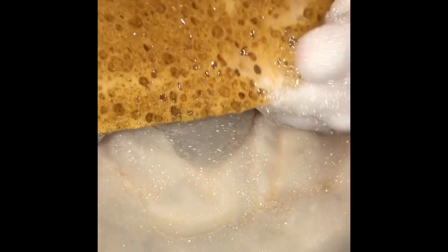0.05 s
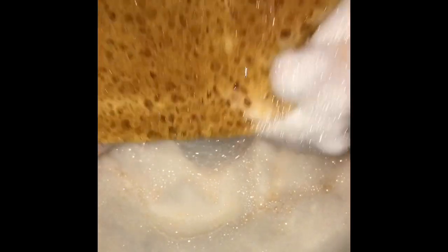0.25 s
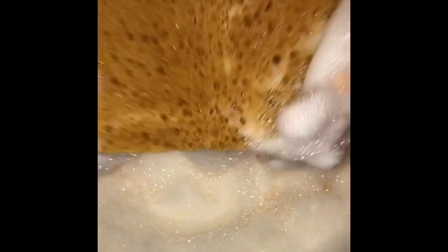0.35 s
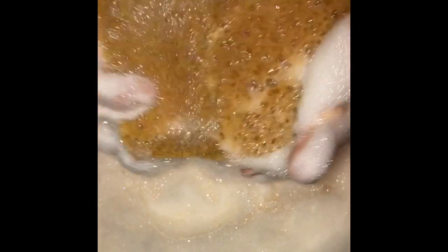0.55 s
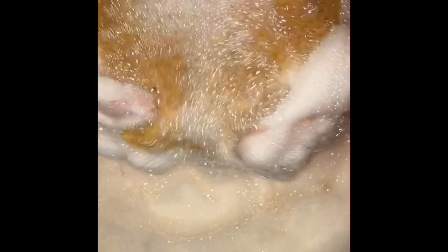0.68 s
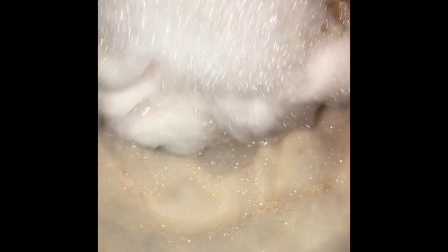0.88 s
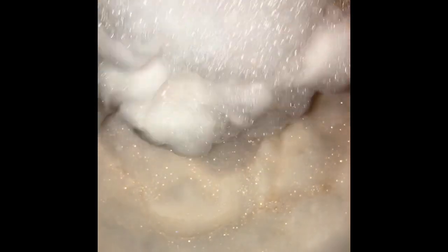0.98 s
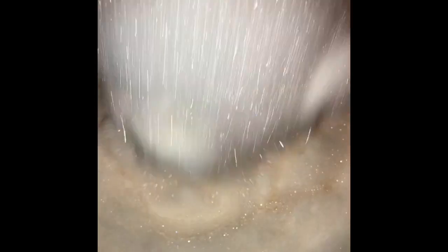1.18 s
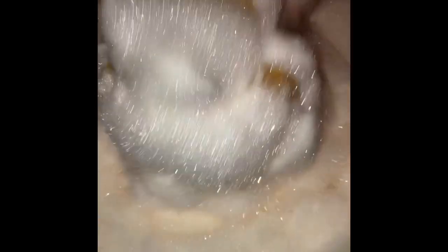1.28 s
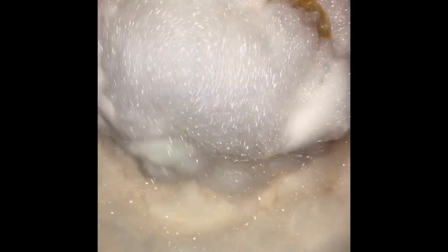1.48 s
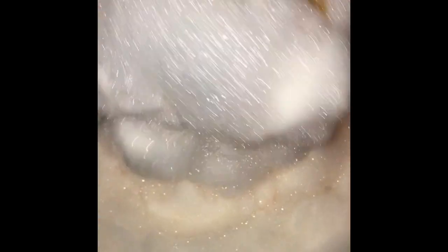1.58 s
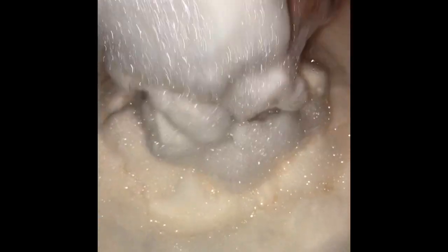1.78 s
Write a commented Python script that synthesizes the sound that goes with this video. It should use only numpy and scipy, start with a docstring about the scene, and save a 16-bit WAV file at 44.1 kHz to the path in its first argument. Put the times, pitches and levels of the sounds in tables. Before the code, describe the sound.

Close squishing and fizzing of a soapy sponge being squeezed, then a few small wet spurts.

```python
"""A soapy sponge is squeezed by two hands over a basin of foam, close to a mono microphone in a quiet room.
Lather churns in the cavity of the hands, water gurgles, and air fizzes from the pores until the sponge
is flat. A second grip forces out a few wet spurts and low gulps; all the while the foam crackles faintly.
Bursting films act as impulses, and ringing bubbles as damped oscillators."""
import sys
import numpy as np
from scipy import signal
from scipy.fft import rfft, irfft, next_fast_len
from scipy.io import wavfile
from scipy.ndimage import map_coordinates

SR = 44100
rng = np.random.default_rng(int(sys.argv[2]) if len(sys.argv) > 2 else 0)


def output_pcm(signal):
    """Save a mono or channel-first signal as 16-bit PCM at the path in sys.argv[1].

    Samples are clipped to [-1, 1] before scaling.
    """
    pcm = np.clip(np.atleast_2d(signal).T, -1, 1) * 32767
    wavfile.write(sys.argv[1], SR, np.round(pcm).astype(np.int16))


N = 81585


def amp(db):
    """Amplitude ratio of a level in decibels."""
    return 10 ** (np.asarray(db) / 20)


def unit(x):
    """Normalisation to unit rms."""
    return x / np.sqrt(np.mean(x ** 2) + 1e-20)


def curve(rows):
    """Linear interpolation of (time [s], value) rows at every sample."""
    return np.interp(np.arange(N) / SR, *np.transpose(rows))


def wobble(knots_per_s):
    """Random modulation: a spline through Gaussian values."""
    return map_coordinates(rng.standard_normal(1000), [np.arange(N) * knots_per_s / SR], mode="wrap")


def coloured(x, spectrum):
    """Minimum-phase filtering by (frequency [Hz], gain [dB]) rows, at unit rms."""
    m = 2 * next_fast_len(N)
    hz, db = np.transpose(spectrum)
    gain = amp(np.interp(np.log(np.fft.rfftfreq(m, 1 / SR) + 1), np.log(hz), db))
    cepstrum = irfft(np.log(gain), m)
    cepstrum[1:m // 2] *= 2  # folding onto positive time makes the filter causal
    cepstrum[m // 2 + 1:] = 0
    return unit(irfft(rfft(x, m) * np.exp(rfft(cepstrum)), m)[:N])


def pops(per_s, spread_db):
    """Shot noise: films burst independently, each an impulse of random size and sign."""
    size = amp(spread_db * np.minimum(rng.exponential(size=N), 4))
    bursts = rng.random(N) < per_s / SR
    return unit(bursts * size * rng.choice([-1, 1], N))


def bubbles(low_hz, high_hz, decay_cycles, spread_db, rise, count):
    """Bubble resonance: a swarm of damped sinusoids, each climbing a little in pitch."""
    onset, pitch, size, life = rng.random((count, 4)).T[:, :, None]
    hz = low_hz * (high_hz / low_hz) ** pitch
    k = np.arange(SR // 80)
    age = k / SR * hz / (decay_cycles * (.5 + life))  # in decay times
    phase = 2 * np.pi * hz * k / SR * (1 + rise * np.minimum(age, 2))
    gain = amp(-spread_db * np.log(np.maximum(size, .03))) * rng.choice([-1, 1], (count, 1))
    tones = gain * np.sin(phase) * np.exp(-age)
    samples = (onset * N).astype(int) + k
    return unit(np.bincount(samples.ravel(), tones.ravel())[:N])


# Resonance of the cupped hands (time [s], frequency [Hz], strength [ratio])
HAND_RESONANCE = [(0, 990, 0.45), (.4, 980, .15), (.65, 1450, 0.39), (.85, 1330, 1.25), (1.05, 1270, 1.1),
                  (1.25, 1040, 1.3), (1.34, 1130, 0.54), (1.48, 1060, 1.4), (1.58, 880, 0.45),
                  (1.75, 1200, 0.64)]


def hand_cavity(x):
    """Cavity resonance: the hands ring at a pitch set by the grip, more clearly as they close."""
    rows = np.array(HAND_RESONANCE)
    hz, strength = curve(rows[:, :2]), curve(rows[:, ::2])
    centres = np.geomspace(850, 1600, 8)  # Hz; the pitch moves by crossfading these resonators
    ring = sum(np.interp(hz, centres, share) * signal.lfilter(*signal.iirpeak(centre, Q=5.5, fs=SR), x)
               for centre, share in zip(centres, np.eye(len(centres))))
    return unit((x + strength * ring) / (1 + strength / 2))


# Flow of lather (time [s], relative level [dB])
LATHER_FLOW = [(0, -63.5), (.095, -58.5), (.125, -59.5), (.2, -52.5), (.3, -46.5), (.36, -41), (.45, -40.5),
               (.53, -41.5), (.64, -39), (.73, -42.5), (.8, -45.5), (.9, -46.5), (1.03, -48.5),
               (1.1, -55.5), (1.16, -66.5), (1.227, -62), (1.234, -51), (1.275, -55), (1.34, -48),
               (1.36, -51.5), (1.42, -51.5), (1.5, -55.5), (1.59, -52.5), (1.655, -67.5), (1.74, -58),
               (1.8, -63), (1.85, -59)]
# Spectrum of the churning (frequency [Hz], gain [dB])
LATHER_SPECTRUM = [(60, -33), (150, -26), (330, -16.5), (560, -11), (720, -6), (900, -0.5), (1400, 0.5),
                   (1750, -2), (2300, -8.5), (4000, -17.5), (15000, -39.5)]


def lather():
    """Source and resonator: large bubbles form and burst in the lather, exciting the hand cavity."""
    swarm = bubbles(low_hz=395.3, high_hz=2564, decay_cycles=3.46, spread_db=3.5, rise=.046, count=2600)
    churn = coloured(pops(per_s=4000, spread_db=3) + amp(-10.5) * swarm, LATHER_SPECTRUM)
    return hand_cavity(churn) * amp(curve(LATHER_FLOW) + .5 + .66 * wobble(70))


# Resting foam, livelier when freshly stirred (time [s], level [dB])
FOAM_LEVEL = [(0, -70.5), (.2, -70), (.9, -69), (1.15, -64.5), (1.31, -63), (1.46, -64.5), (1.62, -66.5),
              (1.85, -67.5)]
# Spectrum of its bursts (frequency [Hz], gain [dB])
FOAM_SPECTRUM = [(300, 5), (1500, -1), (4000, 0.5), (8000, 2.5), (13000, -1), (15500, -2)]


def foam_crackle():
    """Film rupture: single bubbles keep bursting in the resting foam."""
    return amp(curve(FOAM_LEVEL)) * coloured(pops(per_s=2000, spread_db=2.5), FOAM_SPECTRUM)


# Tearing of small bubbles (time [s], level [dB])
FROTH_LEVEL = [(0.0, -70), (0.06, -59.5), (0.128, -62.5), (0.39, -44), (0.478, -43.5), (0.68, -38),
               (0.906, -50), (1.014, -53), (1.04, -47.5), (1.128, -68.5), (1.216, -68.5), (1.236, -55.5),
               (1.252, -63.5), (1.386, -58), (1.498, -66), (1.576, -52.5), (1.654, -71), (1.85, -65)]
# Spectrum of the froth (frequency [Hz], gain [dB])
FROTH_SPECTRUM = [(500, -47.5), (1700, -8), (2200, 3.5), (2650, 0), (3150, 2.5), (3550, -2.5), (4100, -1.5),
                  (5500, -8.5), (7500, -15), (15000, -39)]


def froth():
    """Resonance rises as radius falls: small bubbles tear and ring high at the sponge's surface."""
    swarm = bubbles(low_hz=1798, high_hz=5690, decay_cycles=5.2, spread_db=2.5, rise=.023, count=3000)
    tearing = coloured(pops(per_s=4000, spread_db=1.5) + amp(-10) * swarm, FROTH_SPECTRUM)
    return tearing * amp(curve(FROTH_LEVEL) + .6 * wobble(70.3))


# Water shifting inside the sponge (time [s], level [dB])
WATER_LEVEL = [(0, -74), (.09, -59.5), (.14, -74), (.22, -57.5), (.33, -55), (.39, -48.5), (.46, -53),
               (.55, -53), (.65, -51.5), (.73, -54.5), (.8, -56), (.92, -60), (1.02, -65.5), (1.13, -61),
               (1.22, -74), (1.33, -58.5), (1.45, -63), (1.58, -65), (1.66, -84), (1.85, -77)]
# Spectrum of the gurgle (frequency [Hz], gain [dB])
WATER_SPECTRUM = [(30, -25), (70, -3), (160, -5.5), (310, -1.5), (420, 0), (520, -2), (750, -4.5),
                  (950, -6.5), (1400, -15.5), (4000, -40), (15000, -55)]


def slosh():
    """Heavily damped oscillation: bubbles gurgle low as water moves through the compressed sponge."""
    swarm = bubbles(low_hz=200.6, high_hz=1034, decay_cycles=1.67, spread_db=1.5, rise=.078, count=1200)
    gurgle = coloured(pops(per_s=3000, spread_db=3) + amp(-20) * swarm, WATER_SPECTRUM)
    return gurgle * amp(curve(WATER_LEVEL) + .32 * wobble(40.6))


# Air leaving the pores (time [s], level [dB])
AIR_LEVEL = [(0, -81), (.04, -71), (.058, -57), (.092, -58.5), (.125, -74), (.19, -62), (.32, -50),
             (.39, -42), (.47, -46.5), (.56, -44), (.655, -39.5), (.745, -40.5), (.82, -53.5), (.89, -61.5),
             (1.1, -91)]
# Spectrum of the fizz (frequency [Hz], gain [dB])
FIZZ_SPECTRUM = [(300, -38), (1500, 2), (3000, -5), (5000, -0.5), (7000, -0.5), (7600, -5), (9700, -3.5),
                 (10300, -8.5), (11800, -6.5), (15500, -11)]


def fizz():
    """Dense shot noise: air blows thousands of tiny bubbles from the pores, and their pops merge."""
    hiss = coloured(pops(per_s=9000, spread_db=0), FIZZ_SPECTRUM)
    return hiss * amp(curve(AIR_LEVEL) + .36 * wobble(81.2))


# Jets of lather (crest time [s], level [dB], rise width [s], fall width [s])
SPURT_EVENTS = [(1.046, -47.5, 0.0093, 0.0059), (1.187, -57.5, 0.01, 0.0081), (1.233, -53.5, .002, 0.011),
                (1.338, -56.5, 0.019, 0.023), (1.388, -47.5, 0.01, 0.018), (1.572, -47.5, .018, .032)]
# Spectrum of a jet (frequency [Hz], gain [dB])
SPURT_SPECTRUM = [(80, -30), (250, -3), (400, 6), (650, -7.5), (860, 3), (1200, 0.5), (2300, -7.5),
                  (3200, -11.5), (4700, -25), (8000, -50), (15000, -44)]


def spurts():
    """Flow through a gap: lather rushes between the fingers in lopsided Gaussian pulses of noise."""
    t = np.arange(N) / SR
    envelope = sum(amp(db) * np.exp(-.5 * ((t - crest) / np.where(t < crest, rise, fall)) ** 2)
                   for crest, db, rise, fall in SPURT_EVENTS)
    return envelope * coloured(pops(per_s=3000, spread_db=2.5), SPURT_SPECTRUM)


# Escaping air pockets (time [s], relative level [dB], centre pitch [Hz], span of onsets [s])
GULP_EVENTS = [(1.047, -40.5, 405, 0.0034), (1.238, -38.5, 290, .006), (1.381, -35, 620, 0.00903),
               (1.385, -40.5, 302, 0.0055)]


def gulps():
    """Free oscillation: each air pocket breaks into three large, quickly damped bubbles, smallest first."""
    attack_s, decay_s = .0008, .0022
    log_pitch_range, relative_climb_per_s = .49, 40
    out, t = np.zeros(N + SR), np.arange(SR // 20) / SR
    envelope = np.exp(-t / decay_s) * (1 - np.exp(-t / attack_s))
    for start, db, hz, span in GULP_EVENTS:
        for part in np.linspace(0, 1, 3):
            pitch = hz * np.exp(log_pitch_range * (.5 - part) + rng.normal(0, .1))
            phase = 2 * np.pi * pitch * t * (1 + relative_climb_per_s * t / 2)
            onset = int((start + part * span) * SR)
            out[onset:onset + len(t)] += amp(db) * np.sin(phase) * envelope
    return out[:N]


def basin(x, decay_s=.012, reflection_db=-12):
    """Early reflections: the basin's walls add a brief, exponentially decaying cluster of echoes."""
    t = np.arange(SR // 10) / SR
    walls = rng.standard_normal(len(t)) * np.exp(-t / decay_s) * (t > .001)
    return x + amp(reflection_db) * signal.fftconvolve(x, walls / np.linalg.norm(walls))[:N]


# Spectrum of the room's low hush (frequency [Hz], gain [dB])
ROOM_SPECTRUM = [(24, -37), (42, -5), (70, 2), (120, -4), (200, -6.5), (500, -9), (1500, -21),
                 (5000, -21.5), (15000, -29.5)]


def scene():
    """Superposition: the wet sounds in the basin add to the room's hush, alike in both channels."""
    wet = basin(lather() + foam_crackle() + froth() + slosh() + fizz() + spurts() + gulps())
    mono = wet + amp(-65) * coloured(rng.standard_normal(N), ROOM_SPECTRUM)
    return np.array([mono, mono])


def record(dry, low_cut_hz=32, top_hz=15700):
    """Band limiting: the recorder thins the deepest bass and passes nothing above its upper limit."""
    m = 2 * next_fast_len(N)
    hz = np.fft.rfftfreq(m, 1 / SR)
    low_cut = hz ** 4 / (hz ** 4 + low_cut_hz ** 4)
    return irfft(rfft(dry, m) * low_cut * (hz < top_hz), m)[:, :N]


dry = scene()
out = record(dry)
output_pcm(out)
```